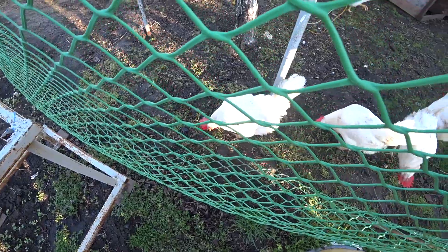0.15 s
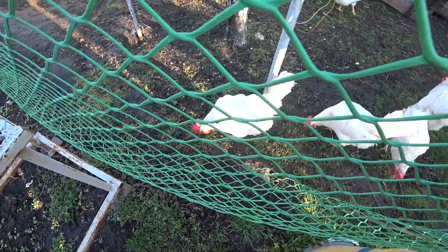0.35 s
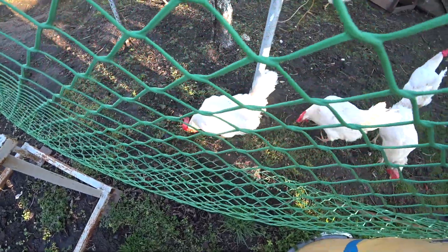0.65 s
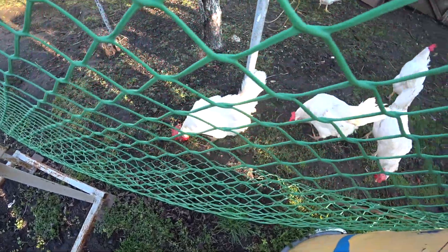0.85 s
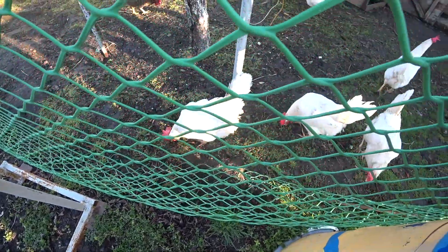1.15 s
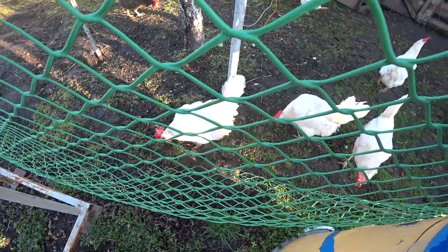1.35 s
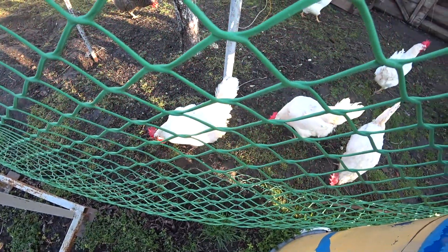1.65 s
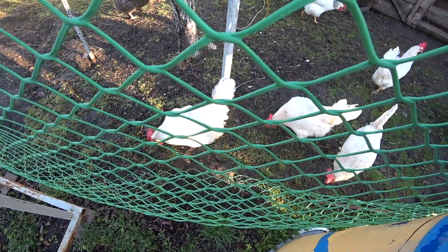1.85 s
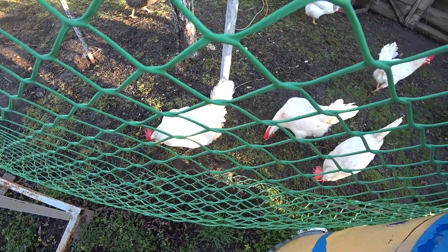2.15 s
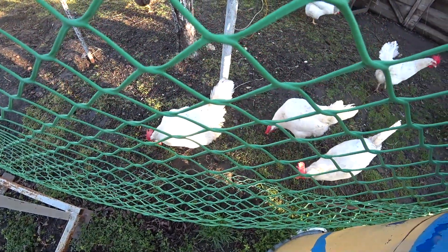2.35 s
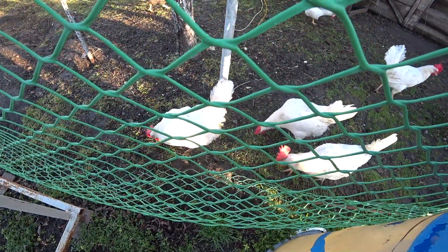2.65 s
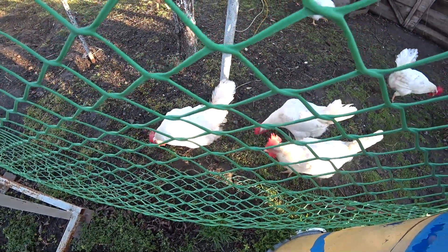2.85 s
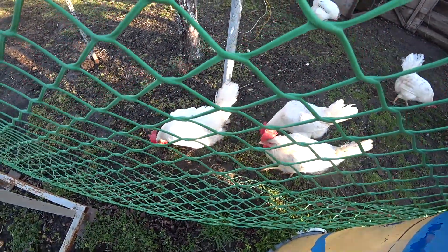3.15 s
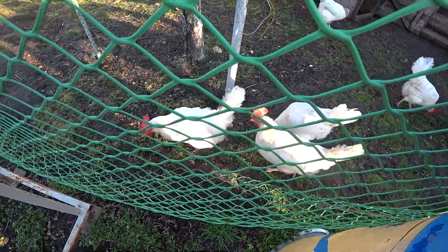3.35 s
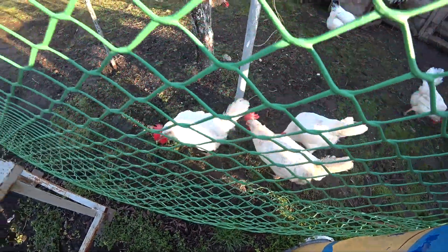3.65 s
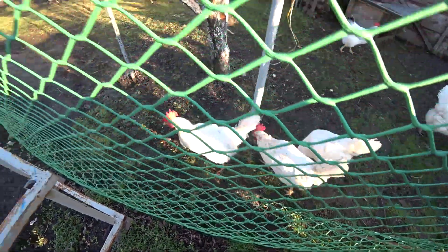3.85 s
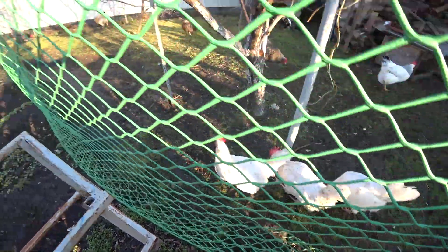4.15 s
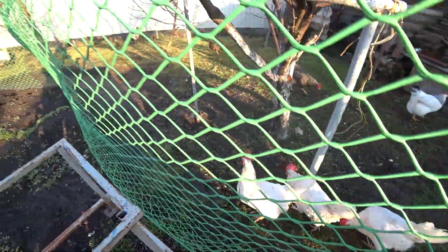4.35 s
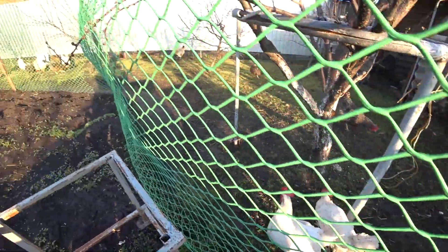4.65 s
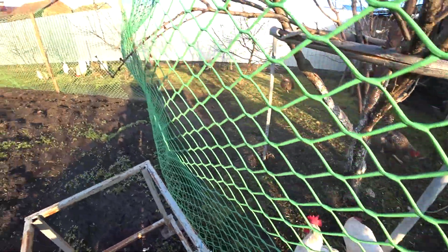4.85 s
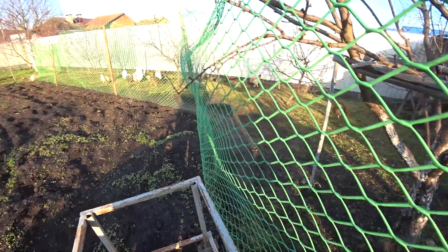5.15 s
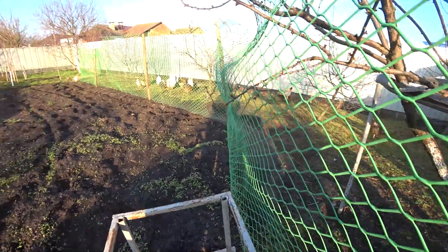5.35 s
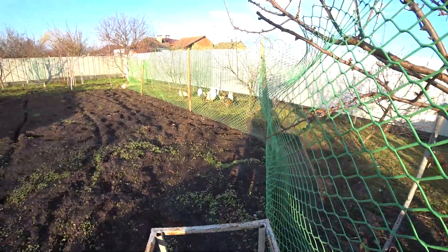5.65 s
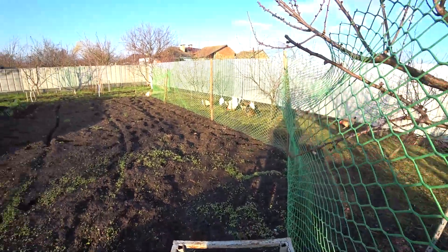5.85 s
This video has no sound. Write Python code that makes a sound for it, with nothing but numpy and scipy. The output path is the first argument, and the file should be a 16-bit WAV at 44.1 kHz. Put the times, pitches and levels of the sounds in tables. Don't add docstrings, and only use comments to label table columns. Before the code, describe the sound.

A hoarse hen, right of a hand-held stereo camera, gives evenly spaced short clucks, then two drawn-out squawks. After a few quieter moments come two more clucks, a long rough squawk and a final run of higher clucks. Other hens murmur, beaks tick, and wind and a distant engine rumble low in an open yard beside a shed.

```python
import sys
import numpy as np
from scipy import signal
from scipy.fft import rfft, irfft
from scipy.io import wavfile
from scipy.ndimage import uniform_filter1d

SR = 44100
rng = np.random.default_rng(int(sys.argv[2]) if len(sys.argv) > 2 else 0)


def wrap_up_sound(samples):
    columns = np.atleast_2d(samples).T
    tamed = np.clip(columns, -1, 1)
    steps = np.round(tamed * 32767).astype(np.int16)
    wavfile.write(sys.argv[1], SR, steps)


def voltage_ratio(level):
    return 10 ** (np.asarray(level, float) / 20)


N = 264159


def evened(x):
    return x / np.sqrt(np.mean(x ** 2) + 1e-20)


def read(points, hz):
    f, value = np.transpose(points)
    return np.interp(np.log(hz + 1), np.log(f + 1), value)


def column(rows, t, index=1):
    return np.interp(t, np.transpose(rows)[0], np.transpose(rows)[index])


def add(mix, s, sound):
    at = round(s * SR)
    part = mix[..., max(at, 0):][..., :sound.shape[-1] + min(at, 0)]
    part += sound[..., max(-at, 0):][..., :part.shape[-1]]


def resonate(x, hz, width):
    turn = np.exp(2j * np.pi * np.cumsum(hz * np.ones(len(x))) / SR)
    r = np.exp(-np.pi * width / SR)
    return 2 * (turn * signal.lfilter([(1 - r) ** 2], [1, -2 * r, r * r], x / turn + 1e-18)).real


def wobble(size, hz):
    return evened(signal.lfilter([1], [1, -np.exp(-2 * np.pi * hz / SR)], rng.standard_normal(size)))


def panned(x, db):
    return x * voltage_ratio(np.array([[db / 2], [-db / 2]]))


def air():
    # pitch in Hz, level in dB per Hz.
    wash_colour = [(35, -15), (60, 1.5), (173, -16), (218, -12), (282, -17.5), (325, -18), (411, -19),
                   (441, -14), (705, -11.5), (831, -16), (5700, -32.5), (12100, -37.5), (15300, -38),
                   (16400, -52)]
    # pitch in Hz, left-right likeness from -1 to 1.
    likeness = [(60, 1), (240, 0.49), (950, 0.027), (3770, -0.23), (15000, 0.33)]
    frames, hz = N // 256 + 5, np.fft.rfftfreq(1024, 1 / SR)
    a, b, c, d, patches = rng.standard_normal((frames, 513, 5)).T
    patches = evened(uniform_filter1d(uniform_filter1d(patches, 12, 0), 14, 1))
    same = np.clip(read(likeness, hz), -1, 1)[:, None]
    left = a + 1j * b
    right = same * left + np.sqrt(1 - same ** 2) * (c + 1j * d)
    sensor_db = 5.5 * np.exp(-((hz - 11700) / 500) ** 2)
    patch_db = 1.6 * np.clip(1.2 - hz / 12000, .2, 1)[:, None] * patches
    z = np.array([left, right]) * voltage_ratio((read(wash_colour, hz) + sensor_db)[:, None] + patch_db)
    return voltage_ratio(-45) * evened(signal.istft(z, nperseg=1024, noverlap=768)[1][:, :N])


def rumble():
    # time in seconds, pitch in Hz, level in dB.
    engine = [
        (0.0, 36.1, -46.5),
        (1.13, 35.7, -45.5),
        (1.25, 34.3, -46.5),
        (4.75, 32.65, -42.5),
        (4.82, 33.67, -34.5),
        (5.79, 34.6, -48),
        (5.91, 35.8, -48),
        (5.99, 37.4, -32),
    ]
    # time in seconds, peak in dB.
    gust_rows = [
        (.92, -36),
        (1.33, -32),
        (2.5, -46),
        (4.09, -29.5),
        (4.57, -31.5),
        (4.87, -33),
        (5.17, -25),
        (5.6, -47),
    ]
    calm_db, rise_db_per_s, fall_db_per_s = -49, 70, 59
    t = np.arange(N) / SR
    hum_db = column(engine, t, index=2) + 3.5 * evened(uniform_filter1d(wobble(N, 6.0), 1500))
    hum = np.sqrt(2) * voltage_ratio(hum_db) * np.sin(2 * np.pi * np.cumsum(column(engine, t)) / SR)
    gusts = rng.standard_normal((3, N))
    gusts = gusts[0] + 0.63 * gusts[1:]
    gusts = signal.sosfilt(signal.butter(2, [18, 90], "bandpass", fs=SR, output="sos"), gusts)
    wind = voltage_ratio(calm_db)
    for s, db in gust_rows:
        wind = wind + voltage_ratio(db - np.maximum(rise_db_per_s * (s - t), fall_db_per_s * (t - s)))
    return voltage_ratio(-2.5) * hum + voltage_ratio(-16) * wind * evened(gusts)


def chirp():
    start_s, length_s, top_hz, fall_hz, level_db = 4.405, .04, 4550, 400, -59
    out, u = np.zeros(N), np.arange(0, length_s, 1 / SR) / length_s
    whistle = np.sin(2 * np.pi * np.cumsum(top_hz - fall_hz * u ** 2) / SR)
    add(out, start_s, voltage_ratio(level_db) * np.sin(np.pi * u) * whistle)
    return out


def murmurs():
    # start in seconds, peak in dB, pitch in Hz, length in seconds.
    murmur_rows = [(0.821, -34, 211, 0.017), (0.998, -40, 272, 0.061), (1.075, -34, 219, 0.026),
                   (1.152, -37, 233, 0.042), (1.263, -40, 350, 0.022), (1.417, -35, 410, 0.023),
                   (1.984, -46, 256, 0.051), (2.571, -37, 267, 0.024), (2.882, -40, 300, 0.028),
                   (3.492, -58, 244, 0.048), (3.896, -42.5, 353, 0.083), (4.09, -49, 341, 0.034),
                   (4.598, -40.5, 353, 0.029), (4.79, -48, 282.4, 0.09)]
    out = np.zeros(N)
    for s, db, hz, length in murmur_rows:
        u = np.arange(0, length, 1 / SR) / length
        rasp = .3 * evened(resonate(rng.standard_normal(4000), 2 * hz, 500))
        phase = 2 * np.pi * np.cumsum(hz * (1.05 - 0.16 * u)) / SR
        tone = np.sin(phase) + .3 * np.sin(2 * phase)
        add(out, s, voltage_ratio(db) * np.sin(np.pi * u ** .6) * (tone + rasp[:len(u)]))
    return out


def ticks():
    # start in seconds, peak in dB, dullness in dB, left minus right in dB.
    tick_rows = [(0.3996, -34, 2, -22), (1.1013, -25.5, -3, -5), (1.3339, -29, -9, -4),
                 (1.795, -33, -8, -3.5), (2.2348, -27, 17, -1.5), (2.2944, -38, -3, 0.0),
                 (2.72, -38, -6, -14.5), (2.9274, -28, 2, -2), (3.187, -22.5, -5, -5),
                 (4.561, -21, -27, -7), (4.581, -28, -25, -4), (5.028, -40, -8, -13)]
    # time in seconds, level in dB.
    scuff = [
        (2.85, -109),
        (2.876, -37),
        (2.91, -45),
    ]
    out, t = np.zeros((2, N)), np.arange(300) / SR
    for s, db, dull_db, pan_db in tick_rows:
        snap = rng.standard_normal(300) * voltage_ratio(-60 * t / .007)
        crack = resonate(snap, 6100, 6800) + voltage_ratio(dull_db) * resonate(snap, 3200, 4000)
        add(out, s, panned(voltage_ratio(db) * crack / abs(crack).max(), pan_db))
    t = np.arange(scuff[0][0], scuff[-1][0], 1 / SR)
    leaves = rng.standard_normal(len(t)) * voltage_ratio(3 * wobble(len(t), 200))
    add(out, t[0], panned(voltage_ratio(column(scuff, t)) * evened(resonate(leaves, 590, 870)), -1.5))
    return out


def yard(x):
    # pitch in Hz, time to die by 60 dB in seconds.
    decay = [(400, 0.48), (1060, 0.3), (2790, 0.43), (7350, 0.17)]
    taps = np.zeros((2, SR))
    at = np.arange(700, SR - 20, 20) + rng.integers(0, 20, (2, (SR - 701) // 20))
    np.put_along_axis(taps, at, rng.choice([-1., 1.], at.shape), 1)
    taps[0] = 0.48 * taps[1] + 0.7 * taps[0]
    hz, t, z = signal.stft(taps, SR, nperseg=256)
    fading = voltage_ratio(-60 * t / read(decay, hz)[:, None])
    far_walls = voltage_ratio(-24.0 - 60 * t / 1.14)
    tail = signal.istft(z * (fading + far_walls), SR, nperseg=256)[1]
    return signal.fftconvolve(x[None], tail / np.linalg.norm(tail[0]), axes=1)[:, :N]


def nearby(x):
    turns_s = [2.25, 4.4]
    # delay in ms, gain.
    echo_sets = [
        [(2.9, 0.15), (4.7, -0.06), (6.5, 0.43), (10.7, 0.43)],
        [(3.8, 0.04), (6.1, 0.32), (9.2, 0.27), (14, 0.13)],
        [(2.6, 0.055), (4.85, 0.19), (5.6, 0.31), (9.4, 0.24)],
    ]
    # pitch in Hz, width in Hz, level in dB.
    shed_sets = [
        [(1121, 39, 2.5), (1310, 18, -2.5), (1420, 10, -53), (2220, 24, 7)],
        [(1215, 130, -6.5), (1354, 74, 1.5), (1817, 120, -2.5), (2560, 40, -58)],
        [(1043, 26, 1), (1179, 51, 4.5), (1340.5, 46, 10), (1573, 37, 3), (1764, 35, -17), (2400, 90, 2),
         (2680, 80, 1), (3050, 62, 4.5)],
    ]
    # pitch in Hz, left minus right in dB.
    side_db = [(60, 7), (130, 0), (290, -1), (640, -4.5), (1410, -13.5), (3100, -9.5), (6820, -4),
               (15000, -5)]
    # pitch in Hz, phase lead of left over right in radians.
    side_lead = [(0, 0), (950, -.5), (1900, .2), (3500, -.1), (7600, -1.5), (11600, -.3)]
    out, edges = np.zeros(N), [0] + [round(s * SR) for s in turns_s] + [N]
    for echoes, modes, a, b in zip(echo_sets, shed_sets, edges, edges[1:]):
        taps = np.zeros(1000)
        taps[0] = 1
        for ms, gain in echoes:
            taps[round(ms * SR / 1000)] = gain
        part = signal.fftconvolve(x[a:b], taps / np.linalg.norm(taps))
        rung = sum(voltage_ratio(db) * resonate(part, hz, width) for hz, width, db in modes)
        add(out, a / SR, part + rung)
    hz, sides = np.fft.rfftfreq(2 * N, 1 / SR), np.array([[.5], [-.5]])
    microphones = voltage_ratio(sides * read(side_db, hz)) * np.exp(1j * sides * read(side_lead, hz))
    return irfft(rfft(out, 2 * N) * microphones)[:, :N]


def cackle(t, held, effort, hz, rough, beak, other_hz):
    # pitch in Hz, width in Hz, level in dB.
    pipe_low = [(949, 260, 3), (1353, 360, 4.5), (1750, 150, -15.5)]
    # pitch in Hz, width in Hz, level in dB.
    pipe_high = [(2397, 482, 5.5), (3254, 482, 2), (3726, 730, 3.5), (4620, 1400, -9.5), (5930, 690, -2),
                 (7510, 1700, -18), (10230, 630, -29.5)]
    size = len(t)

    fade = 302 * np.maximum(t - held, 0)
    rough = np.clip(rough + (.55 - rough) * np.minimum(fade / 15, 1) + .06, 0, 1)
    chest_db = -15 + 0.33 * np.minimum(fade, 30) + 0.57 * (beak + 5)
    beak = beak - 0.7 * fade
    hz = hz * (1 - .05 * np.minimum(fade / 20, 1))

    jitter = 0.1297 * wobble(size, 269) + 0.05105 * wobble(size, 25.44)
    turns = np.cumsum(hz * (1 + rough * jitter)) / SR
    doubling = np.clip(3.6 * rough, 0, 1)
    second, fourth = 0.42 * doubling, .4 * doubling
    turns = turns + 0.085 * second * np.sin(np.pi * turns + .8) + 0.13 * fourth * np.sin(np.pi * turns / 2 + .8)
    cycle = np.floor(turns - .5).astype(int) + 1
    chance = .7 * rough * np.clip(rng.standard_normal(500), -1.6, 1.6)[cycle]
    strength = np.exp(chance + second * (cycle % 2) + fourth * (cycle % 4 == 0))
    pulses = strength * sum(np.cos(2 * np.pi * k * turns) for k in range(1, 22))
    puffs = (0.53 + np.exp(-(turns % 1) / 1.3)) * rng.standard_normal(size) * np.exp(0.13 * wobble(size, 97))
    drive = evened(pulses) + 1.8 * rough ** 2 * evened(puffs)
    hissy = drive + 1.3 * rough * evened(puffs)

    opening = 1 + .003 * np.clip(beak + 8, -12, 6)
    low, high = (sum((-1) ** k * voltage_ratio(db) * resonate(x, f * opening, w) for k, (f, w, db) in enumerate(pipe))
                 for x, pipe in ((drive, pipe_low), (hissy, pipe_high)))
    gape = voltage_ratio(-7 + 1.1 * (beak + 4))
    high = high + gape * resonate(hissy, 2740, 300)
    low = signal.sosfilt(signal.butter(8, 860, "highpass", fs=SR, output="sos"), low)
    chest = resonate(drive, hz, 114) + voltage_ratio(9.5 - (hz - 480) / 14) * resonate(drive, 680, 220)
    chest = chest + voltage_ratio(2.0) * resonate(drive, hz / 2, 56)

    other = np.sin(2 * np.pi * np.cumsum(other_hz * (1 + 0.025 * wobble(size, 87))) / SR)
    other *= (1 + .5 * np.cos(2 * np.pi * turns)) * np.exp(0.51 * wobble(size, 61)) * np.clip(3 * rough, 0, 1)
    throat = low / np.sqrt(np.mean(low[:6000] ** 2)) + voltage_ratio(-8) * other

    throat, high, chest = (x / np.sqrt(uniform_filter1d(x ** 2, 2400) + 1e-12) for x in (throat, high, chest))
    voice = throat + voltage_ratio(beak) * np.clip(t / 0.023, .15, 1) * high + voltage_ratio(chest_db) * chest
    voice *= np.exp(0.37 * rough * evened(uniform_filter1d(wobble(size, 41), 150)))
    attack_db = -18 * np.clip(1 - t / .007, 0, 1)
    return voltage_ratio(effort - fade + attack_db) * voice * signal.windows.tukey(size, 400 / size)


def cluck(start, held, effort_db, top_hz, drop, other_hz):
    easy_hz, strained_hz, low_hz = 565, 605, 488
    swell_s, drop_s = .045, .04
    t = np.arange(12500) / SR
    strain = np.clip((top_hz - easy_hz) / (strained_hz - easy_hz), 0, 1)

    def strained(easy, hard):
        return easy + (hard - easy) * strain

    jump = strained(.048, .028)
    up = np.clip(t / jump, 0, 1) ** 2
    down = np.clip((t - drop) / drop_s + .5, 0, 1)
    first = strained(468, 503)
    hz = (first + (top_hz - first) * up) * (1 - down) + low_hz * down

    clear, steady, dropped = .12, .22, .08
    breaks = np.exp(-((t - .8 * jump) / .018) ** 2) + np.exp(-((t - drop) / drop_s) ** 2)
    break_rough = strained(.58, .3) - steady
    rough = clear + (steady - clear) * up + dropped * down + break_rough * np.minimum(breaks, 1)

    sag = (23.5 + 19 * strain) * np.maximum(t - swell_s, 0)  # dB, faster when strained
    effort = effort_db + (-2 - 5 * strain) * np.clip(1 - t / swell_s, 0, 1) - sag
    beak = -5 - 3 * np.minimum(t / 0.03, 1) + 2 * strain
    return start, cackle(t, held, effort, hz, rough, beak, other_hz)


def squawk(rows, pitch, other_hz):
    start = rows[0][0]
    t = np.arange(27500) / SR
    now = start + t
    effort, beak = column(rows, now), column(rows, now, index=2)
    hz, rough = column(pitch, now), column(pitch, now, index=2)
    return start, cackle(t, rows[-1][0] - start, effort, hz, rough, beak, other_hz)


def scene():
    # start in seconds,
    # held in seconds, effort in dB, top pitch in Hz, drop after seconds.
    cluck_rows = [(-.13, 0.14, -20, 499.5, .05), (0.133, 0.085, -20, 591, 0.26),
                  (.364, 0.13, -23.5, 545, 0.064), (.623, 0.11, -21.5, 558, 0.13),
                  (.902, 0.15, -22.5, 553.7, .085), (1.188, 0.11, -22, 559.4, .15),
                  (1.445, 0.087, -23, 539, 0.14), (1.694, .15, -22, 550, .07),
                  (1.998, 0.086, -22, 576.5, 0.11), (3.576, 0.23, -19.5, 608, .1),
                  (3.937, 0.14, -20, 616.8, .095), (5.158, .095, -19, 636, 0.13),
                  (5.402, .15, -20, 594.7, .095), (5.688, 0.1, -20, 625.2, .14),
                  (5.943, .09, -21.5, 601.5, 0.12)]
    # time in seconds, pitch in Hz, roughness from 0 to 1.
    squawk_pitch = [
        [(2.34, 465, .12), (2.365, 481, .15), (2.415, 465, .1), (2.45, 482, .12), (2.5, 490, .3),
         (2.55, 495, .5), (2.63, 470, .6)],
        [(2.9, 448, .1), (2.96, 466, .1), (3.01, 484, .15), (3.06, 500, .45), (3.11, 520, .3), (3.17, 545, .35),
         (3.27, 540, .4), (3.34, 495, .4), (3.4, 480, .5)],
        [(4.56, 456, .15), (4.6, 464, .15), (4.66, 500, .12), (4.72, 518, .3), (4.76, 562, .5),
         (4.85, 568, .35), (4.95, 608, .35), (5.03, 515, .35), (5.1, 565, .5)],
    ]
    # time in seconds, effort in dB, beak brightness in dB.
    squawk_rows = [
        [(2.34, -22.5, -9), (2.487, -25.5, -5.5), (2.547, -25, -4.5), (2.58, -30, -10.5)],
        [(2.904, -26.5, -11), (3.059, -24.5, -3.5), (3.157, -21.5, -5.5), (3.345, -25.5, -3.5),
         (3.37, -28, -14)],
        [(4.557, -34.5, -6), (4.614, -23, -11), (4.82, -23, -0.5), (4.88, -23.5, -4), (4.94, -22, 0.5),
         (5.01, -21, -7.5), (5.075, -28.5, -1)],
    ]
    other_pitch = [1363, 1346, 920, 1200, 1330, 1210, 1110, 1397, 1126, 1426, 1226, 1197, 1344, 1382, 1353,
                   1200, 1353, 1374]
    hen = np.zeros(N)
    for row, other_hz in zip(cluck_rows, other_pitch):
        add(hen, *cluck(*row, other_hz))
    for rows, pitch, other_hz in zip(squawk_rows, squawk_pitch, other_pitch[len(cluck_rows):]):
        add(hen, *squawk(rows, pitch, other_hz))
    calls = voltage_ratio(-2.5) * nearby(hen) + panned(voltage_ratio(-11.0) * yard(hen), -0.64)
    return calls + panned(murmurs(), -0.96) + ticks() + chirp() + air() + rumble()


def low_pass(x):
    return signal.sosfilt(signal.butter(12, 16530, fs=SR, output="sos"), x)


def record(dry):
    edge = signal.firwin(511, 15900, window=("kaiser", 9), fs=SR)
    limited = signal.oaconvolve(dry, edge[None], "same")
    return low_pass(limited)


dry = scene()
out = record(dry)
wrap_up_sound(out)
```